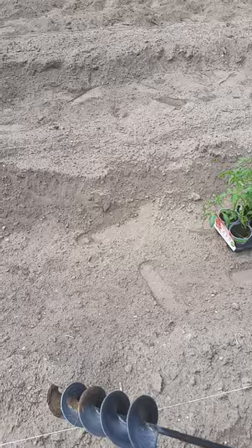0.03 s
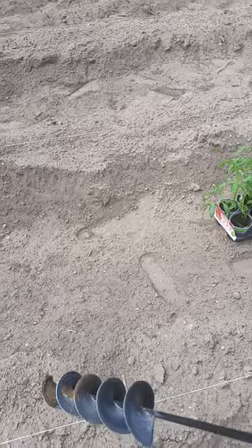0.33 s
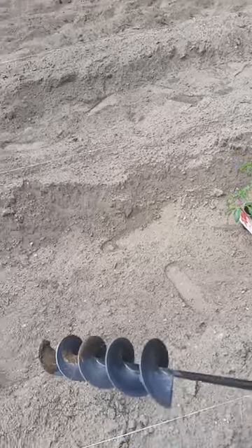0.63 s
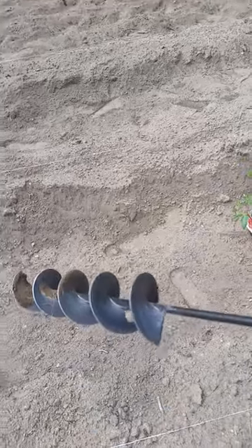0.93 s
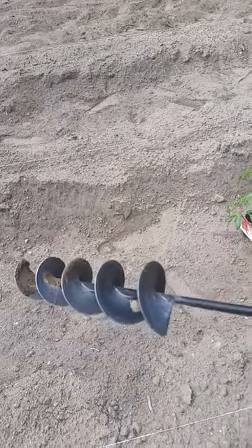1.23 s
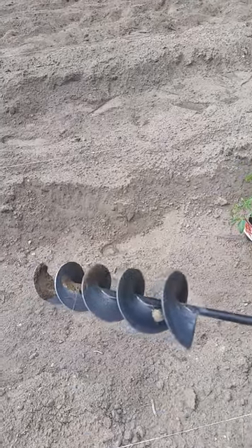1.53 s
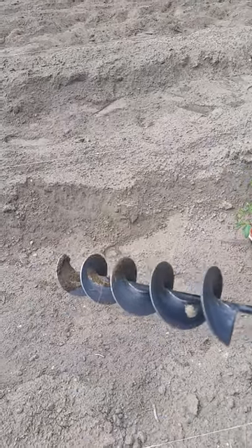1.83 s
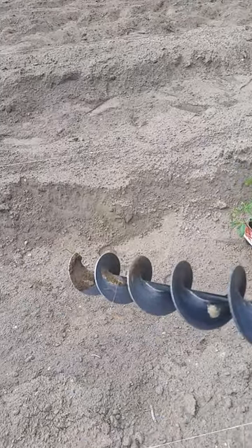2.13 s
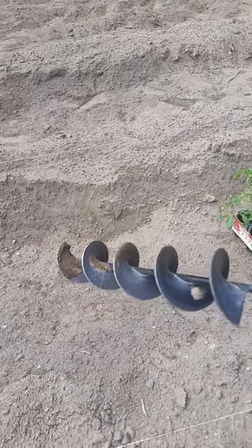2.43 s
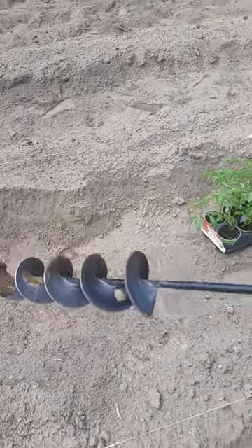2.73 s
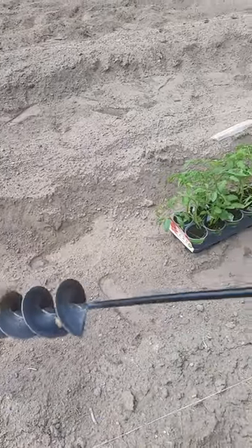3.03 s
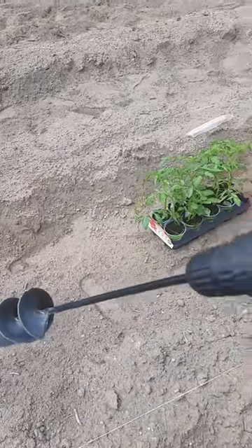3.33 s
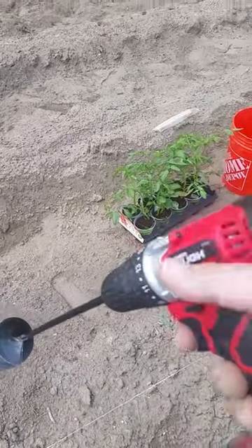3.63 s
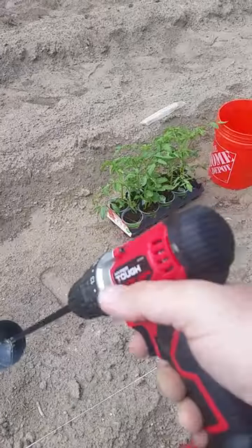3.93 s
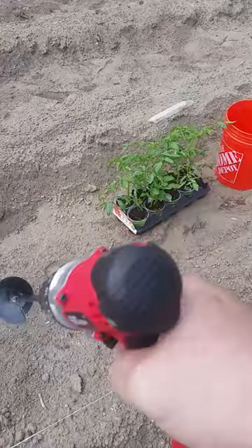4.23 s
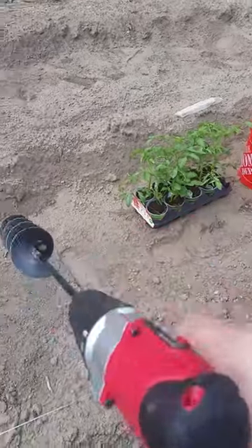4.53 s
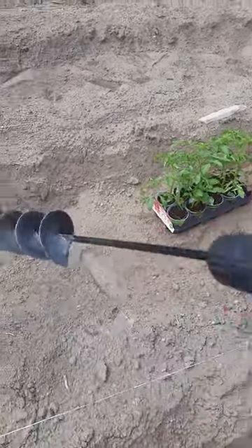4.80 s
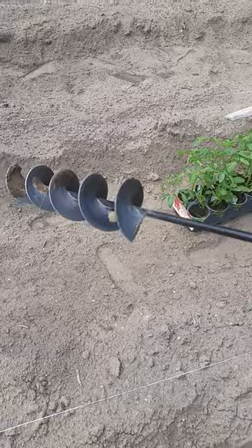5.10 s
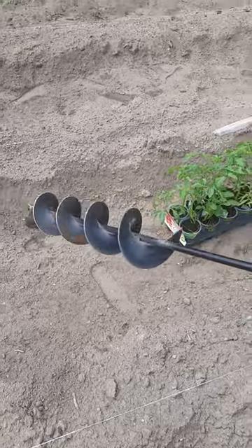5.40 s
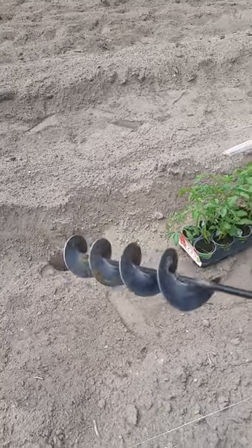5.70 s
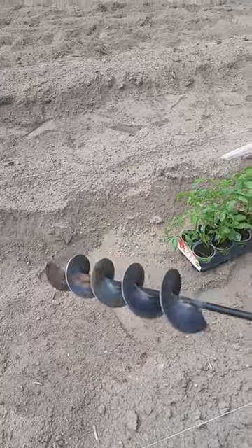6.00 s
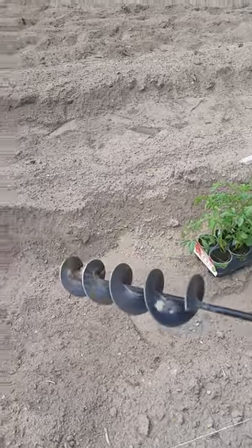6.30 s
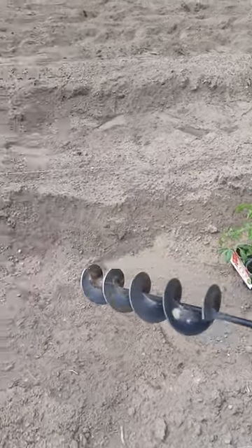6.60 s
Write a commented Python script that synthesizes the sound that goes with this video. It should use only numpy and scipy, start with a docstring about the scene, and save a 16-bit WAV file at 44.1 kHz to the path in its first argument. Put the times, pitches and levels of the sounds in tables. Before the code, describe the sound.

Outdoors, over a faint low rumble and a far-off idling engine, a hand-held microphone takes a sharp knock and a pop on the left, and later a softer bump. After a quiet stretch, a trigger clicks and a cordless drill close by spins an earth auger freely in the air. Its whine rises with rattling gears and a thin hiss, holds at part speed, then climbs faster near the end.

```python
"""Cordless drill spinning an earth auger

Outdoors, a hand-held camera takes a few sharp knocks at its left microphone; an engine idles far off.
A drill's trigger clicks, its speed control sings, and the motor spins an auger freely in the air,
first at part speed, then faster. The rotor drives a rising whine, rattling gears and hissing brushes."""
import sys
import numpy as np
from scipy import signal
from scipy.fft import rfft, irfft, next_fast_len
from scipy.io import wavfile
from scipy.ndimage import uniform_filter1d, minimum_filter1d, map_coordinates

SR = 44100
rng = np.random.default_rng(int(sys.argv[2]) if len(sys.argv) > 2 else 0)


def to_wav(s):
    """Save 16-bit WAV."""
    ch = np.atleast_2d(s).T  # columns
    pcm = np.round(np.clip(ch, -1, 1) * 32767)  # PCM
    wavfile.write(sys.argv[1], SR, pcm.astype(np.int16))


N = 297675

CRUISE_HZ, FULL_HZ = 430, 1440  # whine pitch at part speed (speed = 1) and with unbroken current
ROTOR_CYCLES, GEAR_RATIO = 3, 36  # whine cycles per rotor turn, rotor turns per auger turn


def drill():
    """The motor lags behind the trigger; its speed drives whine, gears and brushes."""
    inertia_s, finger_s = 0.19, 0.043  # time constants of rotor with auger, and of a squeeze
    pitch_hz = trigger_pitch(inertia_s) + 1e-3
    duty = np.clip(trigger_pitch(finger_s) / FULL_HZ, 0, 1)
    speed = pitch_hz / CRUISE_HZ
    strain = duty - pitch_hz / FULL_HZ  # the motor draws current while it catches up
    cycles = np.cumsum(pitch_hz * (1 + 0.003 * wobble(30))) / SR
    motor = whine(cycles, pitch_hz) + gears(cycles, speed) + brushes(cycles, speed)
    return motor + speed_control(duty, strain)


def trigger_pitch(lag_s):
    """The pitch in Hz that the trigger asks for, followed with a time constant."""
    # three ever deeper squeezes: start_s, target_pitch_hz
    pulls = [(5.218, 433), (6.278, 800), (6.595, 970)]
    starts_s, targets_hz = np.transpose(pulls)
    steps_hz = np.diff(targets_hz, prepend=0)
    return sum(step * (1 - np.exp(-since(s) / lag_s)) for s, step in zip(starts_s, steps_hz))


def whine(cycles, pitch_hz):
    """The motor's tone, which the body radiates more strongly at some pitches than at others."""
    # radiation of the body: pitch_hz, left_db, right_db
    radiation = [(99.5, -76, -71), (210, -71, -67), (310, -53, -47), (386, -51, -42.5), (430, -42, -33.5),
                 (475, -37, -29), (587, -54, -39), (650, -52, -39), (850, -57, -38)]
    hz, *sides = np.transpose(radiation)
    level_db = np.array([np.interp(np.log(pitch_hz), np.log(hz), side) for side in sides])
    return tone(cycles, level_db + 2.1 * wobble(25))


def gears(cycles, speed):
    """Teeth clatter and sing through the housing, louder and more ragged with speed."""
    # tones of the meshing teeth: whine_multiple, relative_db
    mesh_tones = [(.333, -13.5), (1.25, -23.5), (1.667, -24), (2.03, -22), (2.5, -21.5), (3.05, -23),
                  (4.6, -26)]
    # gearbox resonances that the tones sweep through: centre_hz, width_hz, gain_db
    gearbox = [(1090, 110, -4.5), (1424, 71, 8), (1990, 170, -4.5)]
    # response of the drill's housing: frequency_hz, left_db, right_db
    housing = [(99, -24, -25), (285, -14, -11), (417, -9, -2.5), (790, -15.5, -2.5), (990, -13, 3.5),
               (1320, -9, -0.5), (1630, -5, -1), (2086, 2, 4), (2205, -9.5, -4.5), (2750, -6, -1),
               (3340, 4, -12), (4360, -11.5, -14), (6130, -28, -29), (8900, -56.5, -41)]
    rotor = cycles / ROTOR_CYCLES
    teeth = contacts(rotor, rough=2.35, count=24)
    scrape = rng.standard_normal((2, N))
    # the clatter swells once per turn of the rotor and of the planet gears
    throb = amp(0.82 * np.sin(2 * np.pi * rotor) + 0.89 * np.sin(np.pi * rotor) + 1.66 * wobble(45))
    clatter = (0.82 * teeth + 1.07 * scrape) * throb
    scatter_rad = 0.42 * speed ** 1.56
    mesh = sum(tone(k * cycles, db + 3.9 * wobble(15), scatter_rad * wobble(55)) for k, db in mesh_tones)
    mesh_db = -0.7 + 6 * np.clip(-np.log2(speed), 0, 1)  # tones stand out below part speed
    rattle = coloured(clatter + amp(mesh_db) * resonant(mesh, gearbox), housing)
    # the rattle eases once per turn of the auger
    lull_db = 4 * np.abs(np.cos(np.pi * (rotor / GEAR_RATIO - 0.85))) ** 4.6
    bite_hz, rise_db_per_hz = 96, 0.01  # below bite_hz the teeth are still taking up their slack
    bite = 1 / (1 + (bite_hz / (CRUISE_HZ * speed)) ** 4)
    level_db = -36.5 + rise_db_per_hz * CRUISE_HZ * (speed - 1.5) - lull_db
    return bite * amp(level_db) * unit(rattle)


def brushes(cycles, speed):
    """The brushes tick over the commutator bars, spark and whistle thinly."""
    # commutator tones: whine_multiple, relative_db
    commutator = [(18, -18), (25.33, -23), (34, -21), (36.33, -16), (37.33, -17), (38.33, -19)]
    # colour of the brush hiss: frequency_hz, left_db, right_db
    hiss_colour = [(3000, -50, -37), (6200, -35, -21), (8200, -22, -17.5), (9000, -33, -24.5),
                   (10760, -37, -9.5), (11800, -25, -15.5), (14900, -23, -3)]
    sparks = 1.13 * rng.standard_normal((2, N)) * amp(2.7 * np.sin(2 * np.pi * cycles))
    whistle = sum(tone(k * cycles, db + 1.8 * wobble(14), 1.15 * wobble(90)) for k, db in commutator)
    bar_ticks = 0.71 * contacts(cycles / ROTOR_CYCLES, rough=0.58, count=18)
    hiss = coloured(bar_ticks + sparks + whistle, hiss_colour)
    cruise_db, rise_db_per_octave = -51.5, 10.5
    return amp(cruise_db + rise_db_per_octave * np.log2(speed) + 1.2 * wobble(28)) * unit(hiss)


def speed_control(duty, strain):
    """Current chopped at a fixed rate sings, louder under strain; pulse width weights each harmonic."""
    # first and second harmonic of the chopping: left_db, right_db
    harmonics = [(-53, -47.5), (-48, -69)]
    chop_hz, strain_db = 1721, 16
    cycles = chop_hz * since(0)
    song = 0
    for k, (left_db, right_db) in enumerate(harmonics, 1):
        weight = amp([[left_db], [right_db]]) * np.sin(np.pi * k * duty)
        song += weight * tone(k * cycles, 2.1 * wobble(21), 0.29 * wobble(40))
    return amp(-1 + strain_db * strain) * song


def trigger_click():
    """The switch snaps shut: two dry cracks in the plastic grip, each with a short chatter."""
    # switch contacts closing: start_s, strength_db
    snaps = [(5.1825, -4), (5.1849, -12)]
    # response of the grip: frequency_hz, left_db, right_db
    grip = [(397, -44, -25), (1200, -19, -11), (2100, -10, -6), (2500, -14, -12), (2860, 0.5, -7),
            (3640, 7, -7), (4360, 5, 8), (4700, -7, -12), (6940, -22, -17), (9300, -38, -35),
            (10220, -34, -7), (11400, -34, -25), (14400, -30, -16)]
    cracks = sum(amp(db) * impulse(s) for s, db in snaps)
    chatter = sum(decay(s, db - 15, t60_s=0.014) for s, db in snaps)
    return coloured(cracks + chatter * rng.standard_normal(N), grip)


def camera_knocks():
    """Knocks ring the camera case, which rebounds dully a few milliseconds later."""
    # blows on the case: start_s, strength_db, brightness_hz
    hits = [(0.7825, 26, 5030), (.9531, 16.5, 740), (4.044, -0.5, 480)]
    # response of the case: frequency_hz, gain_db
    case = [(20, -42), (100, -0.5), (700, 2), (1250, 1), (1600, -4), (2400, -13), (2950, -41), (3300, -19),
            (4300, -16), (7000, -39)]
    # ringing modes of the case: pitch_hz, gain_db, t60_s
    case_modes = [(925, -33, 0.0076), (1284, -36.5, 0.013), (3360, -38, 0.0087)]
    blows = sum(amp(db) * passed(impulse(s), bright_hz, "low", order=5) for s, db, bright_hz in hits)
    rebounds = sum(amp(db) * (0.17 * impulse(s + 0.0071) - 0.65 * impulse(s + 0.00302))
                   for s, db, _ in hits)
    thuds = coloured(blows + passed(rebounds, 457, "low", order=3), case)
    t = np.arange(SR // 30) / SR
    ring = sum(amp(db - 60 * t / t60_s) * np.sin(2 * np.pi * hz * t) for hz, db, t60_s in case_modes)
    attack = 1 - np.exp(-t / 0.00055)
    return thuds + signal.fftconvolve(blows, ring * attack)[:N]


def microphone_pop():
    """A pressure step at the microphone port leaks away as one sharp pop."""
    # response of the port: frequency_hz, gain_db
    port = [(3000, 1), (6000, -1.5), (9000, -11), (15000, 0)]
    pressure_step = 1.0 * (since(0.9415) > 0)
    return amp(-10.5) * coloured(passed(pressure_step, 81, "high"), port)


def handling_ticks():
    """The hand on the camera makes faint, gritty ticks."""
    # handling ticks: start_s, strength_db
    ticks = [(.578, -48.5), (0.751, -45.5), (1.179, -52), (2.453, -49), (3.282, -50), (5.019, -49)]
    envelope = sum(decay(s, db, t60_s=0.0088) for s, db in ticks)
    return passed(envelope * rng.standard_normal((2, N)), 4000, "high")


def distant_engine():
    """An engine idles far off as a few low, wavering tones."""
    # partials of the idle: pitch_hz, relative_db
    idle = [(59.2, -63), (91.5, -60.5), (118.4, -63), (150.7, -65)]
    return sum(tone(hz * since(0), db + 2.6 * wobble(6.4), 1.17 * wobble(8)) for hz, db in idle)


def background():
    """Low rumble and the far engine slowly grow; the left microphone hisses in a narrow band."""
    # level ride of the whole bed: time_s, level_db
    ride = [(1.05, -55.5), (1.45, -58), (1.85, -56), (5.1, -54)]
    # colour of rumble and hiss: frequency_hz, left_db, right_db
    air = [(25.5, -93.5, -90), (66, -70.5, -71.5), (140, -76.5, -77.5), (299, -87, -88), (410, -87, -85),
           (800, -91, -93), (1650, -87.5, -88.5), (2390, -93, -101), (3020, -88.5, -105), (3314, -77, -106),
           (4710, -87.5, -111), (7420, -110, -114), (9550, -112, -112), (11300, -106, -106),
           (14900, -103, -103)]
    level_db = np.interp(since(0), *np.transpose(ride))
    wide_noise = rng.standard_normal((2, N))
    rumble = passed(coloured(rng.standard_normal(N) + 0.49 * wide_noise, air), 240, "low", order=3)
    hiss = passed(coloured(wide_noise + 0.27 * rng.standard_normal(N), air), 250, "high", order=3)
    low_end = amp(-3.5) * (unit(rumble) + unit(distant_engine()))
    swell_db = 1 + 0.7 * since(0) + 0.93 * wobble(10)
    return amp(level_db + swell_db) * low_end + amp(level_db + 1.5) * unit(hiss)


def contacts(turns, rough, count):
    """Blows of count teeth a turn: each tooth has its own strength, varied at random by rough."""
    teeth_passed = turns * count
    at = np.flatnonzero(np.diff(np.floor(teeth_passed)) > 0)
    tooth = np.floor(teeth_passed[at + 1]).astype(int) % count
    blows = np.zeros(N)
    blows[at] = rng.standard_normal(count)[tooth] + rough * rng.standard_normal(len(at))
    return blows / np.sqrt(np.gradient(teeth_passed) * (1 + rough ** 2))  # equal power at any speed


def resonant(x, modes):
    """x plus its ringing in resonances (centre_hz, width_hz, gain_db)."""
    return x + sum(amp(db) * signal.lfilter(*signal.iirpeak(hz, hz / width, fs=SR), x)
                   for hz, width, db in modes)


def coloured(x, spectrum):
    """Minimum-phase filter from rows (frequency_hz, gain_db, ...), one gain column per channel."""
    size = 2 * next_fast_len(N // 2 + 8192)
    hz, *channels = np.transpose(spectrum)
    log_hz = np.log(np.fft.rfftfreq(size, 1 / SR) + 1)
    gains = amp([np.interp(log_hz, np.log(hz), db) for db in channels])
    cepstrum = irfft(np.log(gains), size)
    cepstrum[:, 1:size // 2] *= 2
    cepstrum[:, size // 2 + 1:] = 0
    return irfft(rfft(x, size) * np.exp(rfft(cepstrum)), size)[:, :N]


def passed(x, edge_hz, kind, order=2):
    """Low-pass or high-pass."""
    return signal.sosfilt(signal.butter(order, edge_hz, kind, fs=SR, output="sos"), x)


def tone(cycles, rms_db, phase_rad=0):
    """A sine that follows a running count of cycles."""
    return np.sqrt(2) * amp(rms_db) * np.sin(2 * np.pi * cycles + phase_rad)


def wobble(rate):
    """A smooth random curve, rate knots a second."""
    knots = rng.standard_normal(int(N * rate / SR) + 4)
    return map_coordinates(knots, [np.arange(N) * rate / SR])


def decay(start_s, peak_db, t60_s):
    """An envelope that jumps to its peak and falls 60 dB in t60_s."""
    return amp(peak_db - 60 * since(start_s) / t60_s) * (since(start_s) > 0)


def impulse(s):
    """A single unit blow at time s."""
    return signal.unit_impulse(N, round(s * SR))


def since(s):
    """Seconds elapsed after time s, zero before it."""
    return np.maximum(np.arange(N) - round(s * SR), 0) / SR


def amp(db):
    """Decibels to gain."""
    return 10 ** (np.asarray(db) / 20)


def unit(x):
    """Scale so that the mean of the channels has rms 1."""
    return x / np.sqrt(np.mean(np.atleast_2d(x).mean(0) ** 2) + 1e-20)


def scene():
    """Drill and handling sit close and dry over the outdoor bed; knocks and pop land hard left."""
    bumps = (camera_knocks() + microphone_pop()) * amp([[0], [-32]])
    return drill() + trigger_click() + bumps + handling_ticks() + background()


def record(dry):
    """The camera fades in, turns loud peaks down and keeps nothing above its band limit."""
    fade_start_s, fade_s, ceiling, top_hz = 0.37, 0.3, 0.93, 15850
    fade = np.minimum(since(fade_start_s) / fade_s, 1)
    needed_gain = np.minimum(1, ceiling / (np.abs(dry) + 1e-9))
    held_gain = minimum_filter1d(needed_gain, size=65)
    limiter = uniform_filter1d(uniform_filter1d(held_gain, size=33), size=33)
    size = next_fast_len(N + SR // 2)
    band = np.clip((top_hz - np.fft.rfftfreq(size, 1 / SR)) / 100, 0, 1)
    return irfft(rfft(dry * limiter * fade, size) * band, size)[:, :N]


dry = scene()
out = record(dry)
to_wav(out)
```